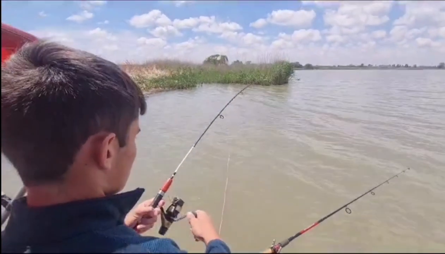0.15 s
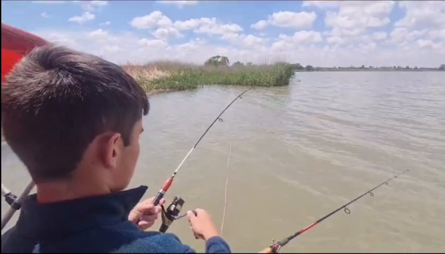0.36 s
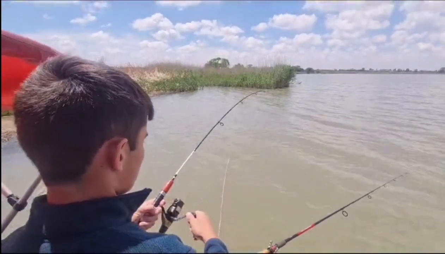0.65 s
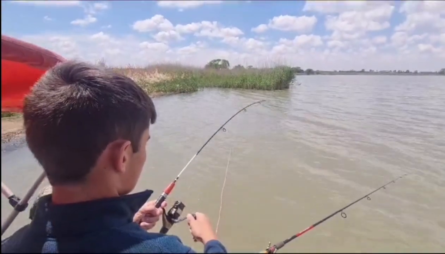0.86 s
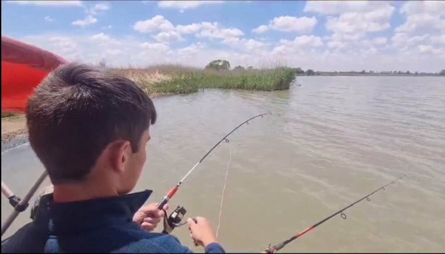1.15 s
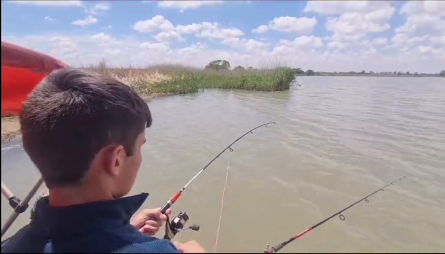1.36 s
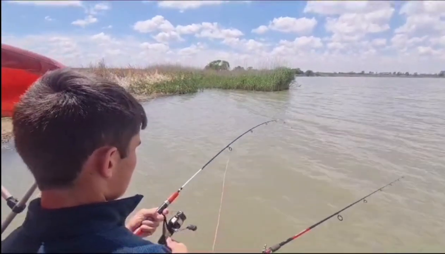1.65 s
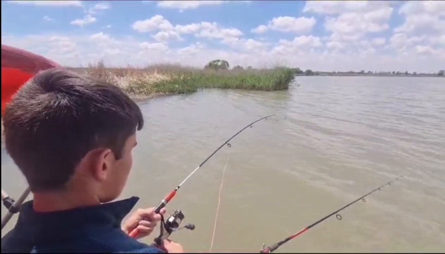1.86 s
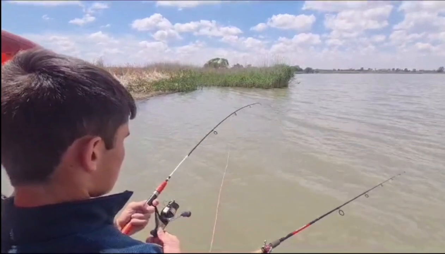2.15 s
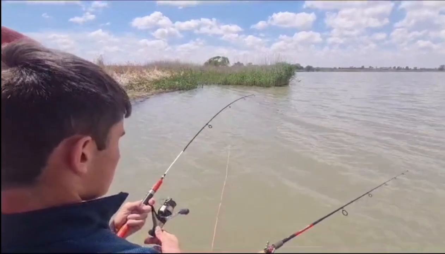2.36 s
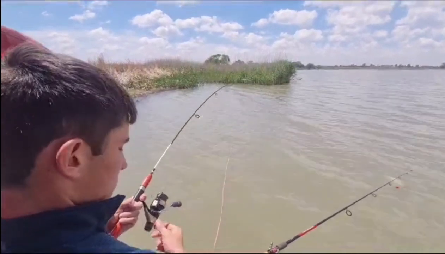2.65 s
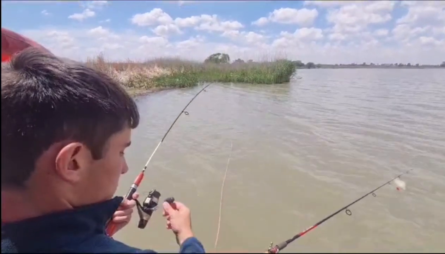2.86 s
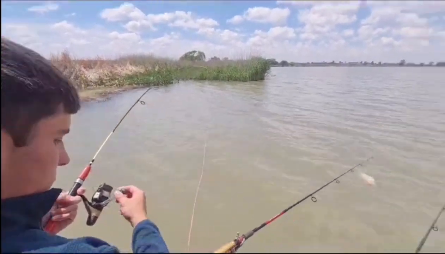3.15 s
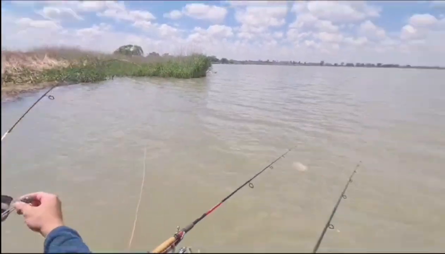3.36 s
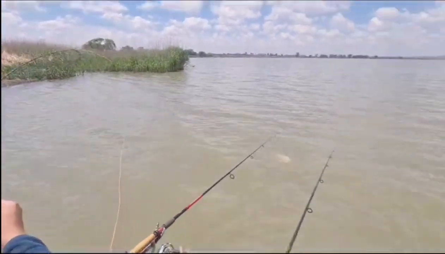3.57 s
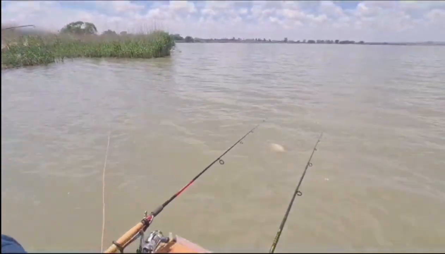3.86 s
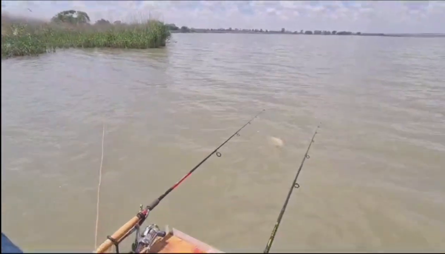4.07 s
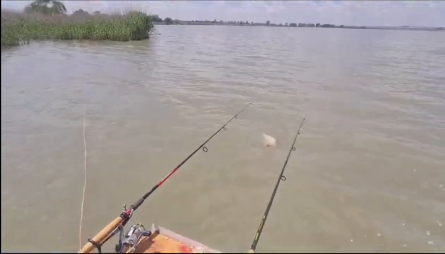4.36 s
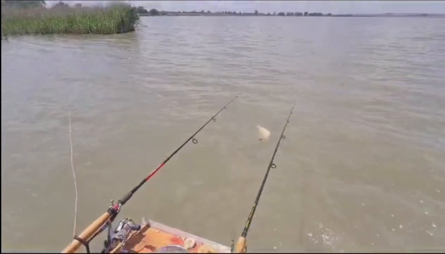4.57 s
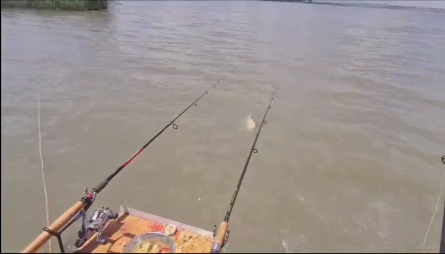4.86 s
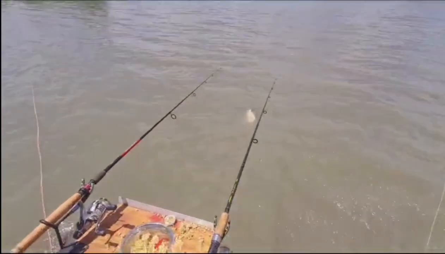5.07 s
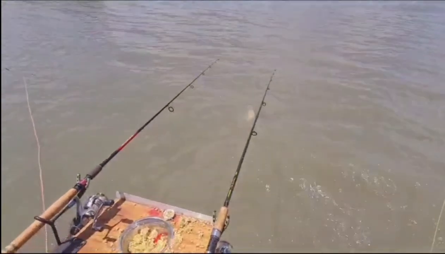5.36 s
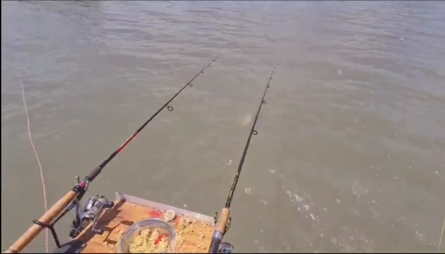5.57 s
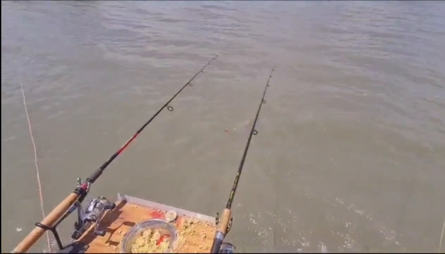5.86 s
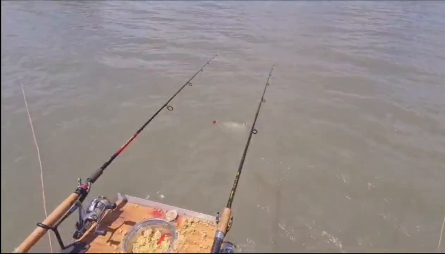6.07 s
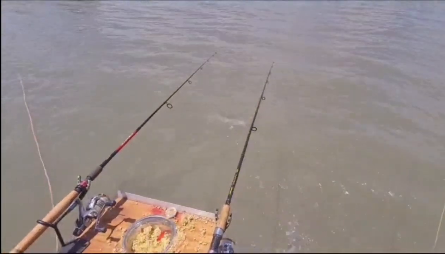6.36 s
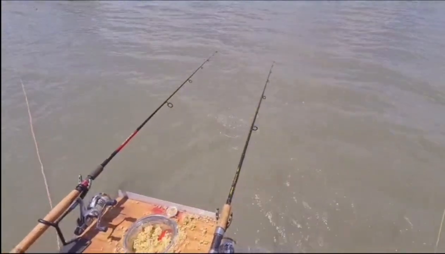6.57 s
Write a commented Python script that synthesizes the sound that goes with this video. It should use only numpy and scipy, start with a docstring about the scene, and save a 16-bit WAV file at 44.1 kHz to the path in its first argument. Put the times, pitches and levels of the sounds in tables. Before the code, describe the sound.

Water slaps and gurgles against a small boat's hull, one hard knock early on, wind buffeting the microphone, then a fishing reel clicks rapidly.

```python
"""Waves slap, gurgle and splash on a small boat: bubble sines and coloured noise, at two ports a few cm apart.
The hull thumps, hums and once knocks hard: blows and wash ring its modes.
Wind buffets each port on its own: gusty low noise and single eddies.
At the end a fishing reel's ratchet clicks, noise gated tooth by tooth, and line hisses off the spool.
Far ripples make a steady hush of noise."""
import sys
import numpy as np
from scipy import signal
from scipy.fft import rfft, irfft
from scipy.io import wavfile
from scipy.ndimage import uniform_filter1d

SR = 44100
rng = np.random.default_rng(int(sys.argv[2]) if len(sys.argv) > 2 else 0)


def store_wav(level_fs):
    """Save 16-bit WAV to argv[1]."""
    pcm = np.round(np.clip(np.atleast_2d(level_fs), -1, 1) * 32767)
    wavfile.write(sys.argv[1], SR, pcm.T.astype(np.int16))


N = 295911
T = np.arange(N) / SR

# Spectrum of the small-bubble gurgle. Each row: frequency in Hz, relative density in dB.
GURGLE_SPECTRUM = [(210, -24), (350, 2), (421, -10), (541, -6.5), (960, -6.5), (1460, -3), (1960, -3.5),
                   (2680, -11), (3200, -22.5), (4160, -49), (7040, -120)]
# Spectrum of spray, also of running line. Each row: frequency in Hz, relative density in dB.
SPRAY_SPECTRUM = [(1530, -3), (2600, -10), (3080, -9), (3980, -5), (7050, -11.5), (8620, -10.5),
                  (10100, -9.5), (14800, -9), (15800, -12), (16500, -54)]


def undb(db):
    """Gain of a level in dB."""
    return 10 ** (np.asarray(db) / 20)


def unit(x):
    """Scale to rms 1."""
    return x / np.sqrt(np.mean(x ** 2))


def curves(table):
    """Interpolate a table's columns over time; its first column is seconds."""
    s, *columns = np.transpose(table)
    return [np.interp(T, s, c) for c in columns]


def colour(x, spectrum):
    """Filter along the last axis by (Hz, dB) points."""
    hz, db = np.transpose(spectrum)
    f = np.arange(x.shape[-1] // 2 + 1) * SR / x.shape[-1]
    gain = undb(np.interp(np.log(f + 1), np.log(hz), db))
    return irfft(rfft(x) * gain, x.shape[-1])


def walk(rate_hz):
    """Random levels held 1 / rate_hz s, slewed, rms near 1."""
    hold = int(SR / rate_hz)
    steps = np.repeat(rng.standard_normal(N // hold + 1), hold)
    return unit(uniform_filter1d(steps, hold))[:N]


def pair(size, alike):
    """Noise for two ports; alike is their correlation."""
    a = np.clip(alike, 0, 1)
    return np.sqrt(a) * rng.standard_normal(size) + np.sqrt(1 - a) * rng.standard_normal((2, size))


def pan(left_minus_right_db):
    """Left and right gains for a level difference."""
    return undb(np.array([left_minus_right_db, -left_minus_right_db]) / 2).reshape(2, -1)


def add(out, s, x):
    """Mix a short sound into out at s seconds."""
    i = max(int(s * SR), 0)
    out[..., i:i + x.shape[-1]] += x[..., :N - i]


def fall(t60_s, rise_s):
    """Time axis and an envelope that rises quickly and dies away."""
    t = np.arange(int(np.clip(t60_s, .004, .6) * SR)) / SR
    attack = 1 - np.exp(-t / max(rise_s, 1e-4))
    return t, attack * 1000 ** (-t / max(t60_s, .004))


def bump(hz, octaves, db):
    """A spectrum raised around one frequency."""
    return [(hz / 2 ** octaves, 0), (hz, db), (hz * 2 ** octaves, 0)]


def burst(spectrum, peak, alike, t60_s, rise_s):
    """Coloured noise that starts quickly and dies away."""
    size = 8192
    t, env = fall(min(t60_s, size / SR), rise_s)
    noise = colour(colour(pair(size, alike), spectrum), peak)
    return env * unit(noise)[:, :len(t)]


def swells(events, rise_share):
    """Gains of events rising and fading straight in dB, one row per level column; powers add.

    The last column, s to fade 20 dB, counts as at least 0.01; the rise takes rise_share of it."""
    power = 0
    for s, *dbs, fade_s in events:
        fade_s = max(fade_s, .01)
        drop_db = 20 * np.maximum((T - s) / fade_s, (s - T) / (fade_s * max(rise_share, .05)))
        power = power + undb(np.array(dbs)[:, None] - drop_db) ** 2
    return np.sqrt(power)


def bubble(hz, cycles, glide, onset_cycles):
    """A dying sine that rises as the bubble nears the surface; glide is the share risen in the cycles."""
    t, env = fall(cycles / hz * 3, onset_cycles / hz)
    phase = 2 * np.pi * hz * (t + glide * t ** 2 * hz / cycles / 2)
    return env / env.max() * np.sin(phase)


def water():
    """Lapping and waves set gurgle, spray and hull hum; slaps, splashes and gulps ride on top."""
    # Lapping between waves. Each row: time in seconds, gurgle in dB, spray in dB.
    lap_table = [(0.0, -68.5, -75), (0.2, -66, -69), (0.48, -65.5, -80), (0.68, -77, -76), (0.75, -57, -61),
                 (1.4, -58, -57), (1.65, -46, -51.5), (2.1, -64, -58.5), (2.45, -67, -59.5),
                 (2.7, -59.5, -53), (3.25, -62, -61.5), (3.52, -56.5, -60), (3.72, -49, -56),
                 (4.25, -65.5, -59), (4.8, -65.5, -61.5), (5.1, -60, -50.5), (6.2, -62, -65),
                 (6.7, -57.5, -50)]
    # Waves at the hull. Each row: crest in seconds, gurgle, spray and hull hum in dB, 20 dB fade in seconds.
    wave_table = [(0.14, -56, -52, -56, 0.08), (0.27, -58.5, -56.5, -50, 0.17),
                  (0.76, -52.5, -59, -78, 0.2), (0.97, -53.5, -69, -51, 0.12),
                  (1.15, -54.5, -47, -52, -0.4), (1.27, -32, -33, -27, 0.0741),
                  (1.49, -49.5, -70, -50, .25), (1.75, -47.5, -43.5, -59, 0.2), (1.96, -73, -49, -76, 0.3),
                  (2.26, -49, -52, -53, 0.17), (2.36, -39.5, -44.5, -48.5, 0.15),
                  (2.56, -40.5, -47, -44, 0.15), (2.62, -41, -43, -43, 0.01), (2.9, -50, -49, -62, 0.3),
                  (3.16, -53, -59, -57, 0), (3.43, -37.5, -39.5, -39, 0.0919),
                  (3.61, -37.5, -50, -44, 0.1328), (3.9, -41, -43.5, -72, 0.1844),
                  (4.14, -59.5, -54.5, -77, 0.3), (4.54, -51, -55, -50.5, 0.23),
                  (4.68, -50.5, -56, -68, 0.06), (4.95, -48.5, -51.5, -58, 0.28),
                  (5.34, -61, -51, -62, 0.4), (5.69, -44.5, -53, -42.5, .15), (5.94, -55.5, -50, -51, 0.27),
                  (6.33, -48.5, -56, -53, 0.35)]
    hum_minus_gurgle_db = -2  # while lapping
    port_lag_samples = 6  # the left port hears the water later
    gurgle_db, spray_db = curves(lap_table)
    lapping = undb([gurgle_db, spray_db, gurgle_db + hum_minus_gurgle_db])
    wash, fizzing, hum = np.hypot(lapping, swells(wave_table, 0.68))
    out = (gurgle() * wash + spray() * fizzing * undb(1.92 * walk(40))) * pan(-1.1)
    out += hull(hum)
    slaps(out)
    splashes(out)
    gulps(out)
    return np.array([np.roll(out[0], port_lag_samples), out[1]])


def slaps(out):
    """Each wave slap is churned noise plus the ringing of a trapped air pocket."""
    # Each row: start in seconds, level in dB, air pocket pitch in Hz, churn t60 in seconds.
    slap_table = [(0.104, -36, 422, 0.073), (0.253, -38.5, 790, 0.041), (0.269, -33.5, 1500, 0.026),
                  (0.737, -37, 770, 0.05), (1.192, -26, 408, 0.12), (1.253, -20, 410, 0.067),
                  (1.279, -30, 1300, 0.088), (1.396, -32.5, 880, 0.024), (1.44, -31, 1360, 0.037),
                  (1.464, -36, 1460, 0.052), (1.704, -29, 720, 0.11), (1.743, -31, 726, 0.12),
                  (1.764, -28.5, 780, 0.086), (1.836, -30, 890, 0.036), (1.916, -33, 1310, 0.028),
                  (2.022, -35.5, 844, 0.058), (2.275, -27, 1660, 0.044), (2.358, -19, 1490, 0.043),
                  (2.373, -20, 1740, 0.041), (2.491, -26, 1730, 0.023), (2.526, -22.5, 1260, 0.092),
                  (2.544, -17, 1136, 0.018), (2.59, -35, 700, 0.063), (2.777, -32.5, 1440, 0.15),
                  (2.894, -34, 880, 0.077), (2.973, -34, 1410, 0.025), (2.991, -30.5, 2330, 0.015),
                  (3.338, -33, 1170, 0.029), (3.415, -25, 413, 0.079), (3.432, -17.5, 1770, 0.034),
                  (3.446, -28.5, 410, 0.15), (3.557, -33, 800, 0.023), (3.592, -24.5, 1500, 0.1),
                  (3.606, -25.5, 565, 0.066), (3.63, -32, 1500, 0.07), (3.654, -31, 666, 0.052),
                  (3.8, -21.5, 1680, 0.041), (3.842, -34.5, 513, 0.18), (3.881, -27.5, 1320, 0.039),
                  (3.895, -26, 528, 0.14), (3.97, -26.5, 1400, 0.025), (4.081, -34, 820, 0.023),
                  (4.136, -31, 1510, 0.08), (4.53, -23.5, 1780, 0.022), (4.684, -26, 2240, 0.047),
                  (4.753, -36.5, 1290, 0.035), (4.79, -33, 1450, 0.052), (4.874, -35, 1510, 0.053),
                  (4.934, -31, 1670, 0.058), (4.958, -28, 1540, 0.022), (5.672, -31.5, 567, 0.03),
                  (6.303, -29.5, 546, 0.02), (6.373, -31.5, 820, 0.064), (6.519, -34, 784, 0.059),
                  (6.541, -34.5, 1160, 0.061), (6.608, -34.5, 770, 0.064)]
    for s, db, hz, t60_s in slap_table:
        churn = burst(GURGLE_SPECTRUM, bump(hz, 0.76, 13.6), 0.63, t60_s, 0.038 * t60_s)
        pocket = bubble(hz, 8.3, 0.022, 0.14)
        add(out, s, 0.5 * undb(db) * churn * pan(-0.48))
        add(out, s, 0.45 * undb(db) * pocket * pan(-1.7))


def splashes(out):
    """Splashes and droplets: short noise bursts brightest at one frequency."""
    # Each row: time in seconds, level in dB, brightest frequency in Hz, t60 in seconds.
    splash_table = [(0.137, -38, 4930, 0.039), (0.153, -39, 3600, 0.042), (0.252, -41, 13890, 0.016),
                    (0.268, -44, 9400, 0.018), (0.725, -47, 5420, 0.025), (0.803, -41, 5260, 0.02),
                    (0.842, -43, 9100, 0.063), (1.124, -43, 13000, 0.025), (1.258, -22, 3700, 0.028),
                    (1.271, -23, 10580, 0.038), (1.506, -24, 15200, 0.02), (1.66, -41, 3600, 0.049),
                    (1.711, -35.5, 5530, 0.075), (1.743, -40, 13790, 0.099), (1.835, -35.5, 13300, 0.054),
                    (1.933, -43, 3800, 0.12), (1.976, -37, 8300, 0.038), (2.173, -41.5, 8510, 0.045),
                    (2.285, -39, 5080, 0.03), (2.34, -37, 4800, 0.048), (2.363, -27, 5750, 0.03),
                    (2.373, -31.5, 9500, 0.064), (2.433, -37.5, 10560, 0.017), (2.521, -36.5, 13900, 0.022),
                    (2.534, -31, 10490, 0.024), (2.542, -35, 4870, 0.052), (2.555, -30, 5000, 0.022),
                    (2.682, -43, 12500, 0.022), (2.86, -39, 12880, 0.081), (2.93, -41, 14330, 0.037),
                    (3.035, -45, 4830, 0.1), (3.351, -42, 7000, 0.12), (3.415, -22, 8500, 0.03),
                    (3.427, -30, 4170, 0.069), (3.482, -47, 4540, 0.017), (3.506, -41, 4700, 0.036),
                    (3.556, -35.5, 5010, 0.018), (3.592, -26, 8300, 0.046), (3.61, -36, 3800, 0.056),
                    (3.707, -39.5, 4100, 0.05), (3.796, -41.5, 4430, 0.053), (3.893, -39.5, 3800, 0.046),
                    (3.911, -22, 3900, 0.014), (4.003, -35.5, 6540, 0.04), (4.117, -38.5, 7850, 0.051),
                    (4.141, -29, 4560, 0.037), (4.26, -47, 5200, 0.03), (4.32, -43, 11000, 0.032),
                    (4.396, -45, 5500, 0.03), (4.438, -42.5, 4960, 0.064), (4.465, -41, 5000, 0.02),
                    (4.479, -42, 13400, 0.025), (4.507, -37.5, 5130, 0.042), (4.527, -32.5, 4600, 0.062),
                    (4.62, -39, 11270, 0.024), (4.669, -33.5, 10250, 0.029), (4.684, -35.5, 3510, 0.032),
                    (4.79, -40.5, 7000, 0.038), (4.903, -44, 10390, 0.032), (4.946, -33, 4900, 0.03),
                    (4.959, -40, 7800, 0.045), (5.014, -47, 3810, 0.049)]
    for s, db, hz, t60_s in splash_table:
        fizz = burst(SPRAY_SPECTRUM, bump(hz, 0.33, 10.6), 0.2, t60_s, 0.04 * t60_s)
        add(out, s - .001, 1.12 * undb(db) * fizz * pan(-0.8))


def gulps(out):
    """Large rising bubbles: upward sine sweeps."""
    # Each row: start in seconds, start pitch in Hz, end pitch in Hz, length in seconds, level in dB.
    gulp_table = [(2.575, 500, 1070, 0.0504, -37.5), (3.055, 690, 940, 0.033, -46.5),
                  (3.133, 690, 990, 0.046, -49.5)]
    for s, start_hz, end_hz, length_s, db in gulp_table:
        hz = np.geomspace(start_hz, end_hz, int(length_s * SR))
        sweep = np.sin(2 * np.pi * np.cumsum(hz) / SR)
        add(out, s, undb(db) * np.hanning(len(hz)) * sweep)


def gurgle():
    """Many small bubbles ring at random over churning noise; rms 1."""
    grains = np.zeros((2, N))
    for place, pitch, size, side, long in rng.random((2800, 5)):
        grain = bubble(400 * 2 ** (2.7 * pitch), 3.86 + 14.8 * long ** 2, 0.15, 1.95)
        add(grains, place * N / SR, grain * undb(16.4 * size ** 3) * pan(12.0 * (side - .5)))
    return unit(colour(unit(grains) + 1.09 * pair(N, 0.43), GURGLE_SPECTRUM))


def spray():
    """Noise, briefly ringing droplets and bands of fizzing drops; rms 1."""
    out = 1.07 * pair(N, 0.077)
    for place, pitch, size, side in rng.random((900, 4)):
        droplet = 2.05 * bubble(3000 * 2 ** (1.5 * pitch), 7.4, 0.086, 0.65)
        add(out, place * N / SR, droplet * undb(10.0 * size ** 3) * pan(9.7 * (side - .5)))
    drops_per_s, power_decay_s = 150, 0.0015
    for hz in (4500, 7500, 12500):  # drops of each size fizz in their own band
        drops = (rng.random(N) < drops_per_s / SR) * undb(3.65 * rng.exponential(size=N))
        power = signal.lfilter([1], [1, -np.exp(-1 / (power_decay_s * SR))], drops ** 2)
        out += .5 * unit(colour(np.sqrt(power) * pair(N, 0.21), bump(hz, 0.79, 11.0)))
    return unit(colour(out, SPRAY_SPECTRUM))


def ring(push, modes):
    """Play a force through decaying resonances, rows of (Hz, dB, t60 s)."""
    out = 0
    for hz, db, t60_s in modes:
        pole = np.exp(2j * np.pi * hz / SR - np.log(1000) / (t60_s * SR))
        out = out + undb(db) * signal.lfilter([1], [1, -pole], push).imag
    return out


def hull(hum):
    """Blows ring the modes near the struck panel; the wash keeps the hull humming."""
    # Blows. Each row: time in seconds, level in dB, struck panel pitch in Hz,
    # lowest modes relative to level in dB, contact in seconds.
    thump_table = [(0.017, -32, 219, -32, 0.0087), (.1, -38, 295, -35, 0.0067),
                   (.27, -31, 293.5, -21, 0.014), (.297, -32, 280, -25, 0.013), (.33, -39, 282, -32, .012),
                   (.365, -39.5, 279, -28, 0.0091), (.843, -39, 270, -27, 0.012),
                   (1.189, -27, 379, -20, .012), (1.257, -22, 300, 13, 0.00454),
                   (1.448, -39.5, 301, -26, 0.011), (1.507, -27, 360, -32, .012),
                   (2.166, -30.5, 211, -24, 0.018), (2.265, -31, 215, -34, .013),
                   (2.363, -29.5, 256, -14.5, 0.02), (2.539, -37, 269, -24, 0.01985),
                   (3.148, -37, 290, -2.5, 0.022), (3.416, -29.5, 272, -6, 0.025),
                   (3.6, -37, 272, -35, .012), (3.897, -39, 305, -31, 0.023), (5.301, -40.5, 290, 2, .014),
                   (6.386, -39, 245, -24, 0.02), (6.611, -41, 266, -14, .011)]
    # Panel modes. Each row: frequency in Hz, gain in dB, t60 in seconds.
    panel_modes = [(165, -1, 0.15), (197.5, -4.5, 0.073), (241, -1, 0.12), (270.5, 3, 0.15),
                   (298.9, 4, 0.17), (327.5, -7, 0.63), (369, 4.5, 0.07)]
    # Whole-hull modes, the close pair beats. Each row: frequency in Hz, gain in dB, t60 in seconds.
    lowest_modes = [(86.5, -20, 0.32), (113.8, -6.5, 0.31), (119.8, -4.5, 0.28)]
    out = unit(ring(rng.standard_normal(N) * undb(3.45 * walk(40)), panel_modes)) * hum
    soft = np.hanning(int(0.0025 * SR))
    soft = soft / soft.sum()
    chances = rng.random((len(thump_table), 8))
    for (s, db, hz, low_db, contact_s), chance in zip(thump_table, chances):
        push = np.zeros(SR // 2)
        push[0] = 1
        # the water keeps jolting the panel while the contact lasts
        jolts = (chance[:4] * contact_s * SR).astype(int) + 1
        push[jolts] = 2.17 * (chance[4:] - .5)
        # modes weaken by 78.5 dB per octave away from the struck panel
        near = [(f, g - 78.5 * abs(np.log2(f / hz)), t60_s) for f, g, t60_s in panel_modes]
        low = [(f, g + low_db, t60_s) for f, g, t60_s in lowest_modes]
        add(out, s, undb(db) * ring(signal.lfilter(soft, [1], push), near))
        # the whole hull follows the first blow only
        first = np.r_[soft, np.zeros(SR // 2)]
        fade_in = np.clip(T[:len(first)] / 0.0054, 0, 1)
        add(out, s - 0.001, undb(db) * ring(first, low) * fade_in)
    # the panel's far end reaches the two ports late and in opposite phase
    far_end = 0.1 * np.roll(out, 40) * np.array([[1], [-1]])
    return (out + far_end) * pan(-1.4)


def wind():
    """Eddies rolling over each port: low noise in sharp-edged gusts, unrelated left and right."""
    # Eddy spectrum. Each row: frequency in Hz, relative density in dB.
    eddy_spectrum = [(12, -30), (25, -6), (45, -1), (65, -1), (100, -8.5), (160, -14.5), (210, -27),
                     (300, -24.5), (600, -40.5), (900, -36), (1500, -100)]
    # Steady breeze. Each row: time in seconds, level in dB.
    breeze_table = [(0.0, -49), (0.3, -59), (0.45, -73), (0.65, -84), (0.8, -45), (1.5, -56), (2.0, -55),
                    (2.35, -60), (2.9, -53), (3.7, -50.5), (4.0, -58), (4.6, -66), (5.03, -74), (5.2, -43),
                    (5.7, -49.5), (6.2, -44), (6.7, -71)]
    # Gusts. Each row: peak time in seconds, left in dB, right in dB, 20 dB fade in seconds.
    gust_table = [(0.35, -48, -50, 0.15), (0.8, -33, -44, -0.3), (1.04, -58, -36, 0.35),
                  (1.16, -31.5, -39, 0.23), (1.6, -34, -34.5, .18), (1.82, -41.5, -39.5, 0.45),
                  (2.2, -58, -50, -0.3), (3.05, -40, -40, 0.16), (3.43, -46, -49, 0.2),
                  (3.81, -46, -37, -0.1), (4.15, -36.5, -33.5, 0.05), (4.23, -62, -45.5, 0.23),
                  (4.42, -34.5, -46, 0.18), (4.53, -33, -28, -0.08), (4.69, -35, -45, 0.08),
                  (4.84, -42, -42, 0.06), (5.12, -53, -41, 0.07), (5.27, -38, -33, .1),
                  (5.31, -55, -35, 0.22), (5.43, -60, -37.5, 0.2), (5.61, -53, -38.5, 0.07),
                  (5.85, -34, -35.5, .25), (6.16, -38.5, -66, 0.3), (6.28, -29, -48, 0.1),
                  (6.36, -28.5, -30.5, 0.12), (6.54, -33.5, -48, 0.32), (6.64, -33.5, -35, 0.4),
                  (6.7, -37, -43, .1)]
    # Single strong eddies. Each row: start in seconds, peak in dB before panning, pitch in Hz,
    # left minus right in dB.
    pop_table = [(1.115, -32, 84, -20), (1.143, -38, 65, 16), (1.602, -35, 71.4, 15),
                 (5.298, -31.5, 80, -22), (5.44, -40.5, 73.5, -21), (5.6, -42.5, 93, -23),
                 (5.806, -37, 66, -13), (5.84, -39, 62, 14), (6.141, -34.5, 68, 26), (6.268, -32, 93, 20.5),
                 (6.351, -36.5, 69.4, -17), (6.371, -41, 70, 22), (6.519, -31, 61.6, 23),
                 (6.637, -32.5, 65, -18), (6.654, -27.5, 62.6, 18)]
    flurry = np.array([undb(1.94 * walk(30) + 2.2 * walk(70)) for _ in range(2)])
    rumble = unit(colour(flurry * rng.standard_normal((2, N)), eddy_spectrum))
    out = rumble * np.hypot(undb(curves(breeze_table)), swells(gust_table, 0.57))
    for s, peak_db, hz, side_db in pop_table:
        t, env = fall(3.2 / hz, 0.015)
        # the pressure swing starts fast and slows as the eddy passes
        swing = env * np.sin(2 * np.pi * hz * (t + 0.0022 * (1 - np.exp(-t / 0.0092))))
        add(out, s, swing / abs(swing).max() * undb(peak_db) * pan(side_db))
    return out


def tooth_times():
    """Times in s of the ratchet teeth, and the spool speed in teeth per s."""
    # Single teeth while the spool is nearly held. Each entry: time in seconds.
    held_teeth = [5.055, 5.066, 6.021, 6.059, 6.113, 6.184, 6.221, 6.251, 6.294, 6.33]
    # Two free runs of the spool. Each row of a run: time in seconds, count of teeth passed.
    spool_runs = [
        [(5.102, 0), (5.125, 2), (5.142, 3), (5.189, 7), (5.258, 14), (5.374, 27), (5.407, 30), (5.462, 34),
         (5.498, 37), (5.547, 40), (5.647, 45), (5.677, 47), (5.833, 60), (5.882, 63), (5.996, 69)],
        [(6.357, 0), (6.43, 4), (6.501, 9), (6.576, 17), (6.7, 31)],
    ]
    times, speed = list(held_teeth), 0
    for run in spool_runs:
        s, teeth = np.transpose(run)
        times += list(np.interp(np.arange(teeth[-1] + 1), teeth, s))
        speed = speed + np.gradient(np.interp(T, s, teeth)) * SR
    return times, speed


def reel():
    """The pawl chatters over each tooth for a few ms and rings the reel's small parts; line hisses."""
    # Small parts. Each row: frequency in Hz, width in Hz, gain facing the reel in dB, turned away in dB.
    part_table = [(2830, 27, 1, -27), (3850, 235, -2, 5.5), (4880, 340, -1, 8), (6850, 220, -15, 10),
                  (8870, 470, -6.5, -3), (10120, 93, 3, 9), (10790, 350, 6, 10.5), (13700, 590, -3, -3),
                  (16200, 1200, -18, 4)]
    # Ratchet. Each row: time in seconds, level in dB, left minus right in dB.
    level_table = [(5.05, -36.5, 4), (5.11, -37, 4.5), (5.15, -41, 8), (5.5, -32, 5), (5.6, -35, 5),
                   (5.7, -38.5, 3.5), (6.0, -42.5, 1.5), (6.3, -42, 2), (6.5, -41.5, 1.5), (6.7, -39.5, 2)]
    # The ports swing away from the reel. Two entries: start and end in seconds.
    turn_s = (5.58, 5.85)
    line_db = -53  # at 100 teeth per s
    times, speed = tooth_times()
    gate = np.zeros(N)
    for t0, (late, size, long) in zip(times, rng.standard_normal((len(times), 3))):
        snap = np.hanning(int(0.009 * (1 + 0.26 * np.tanh(long)) * SR))
        snap = snap * np.exp(-1.5 * np.linspace(-1, 1, num=len(snap)))  # sharper at the front
        add(gate, t0 - len(snap) / SR / 2 + 0.00093 * late, snap * undb(1.3 * size))
        add(gate, t0, .2 * fall(.025, .001)[1])  # the parts buzz on briefly
    chatter = gate * pair(N, 0.24) * undb(1.73 * walk(1500))

    f = np.geomspace(1500, SR / 2, num=300)
    low_cut = np.clip(f / 3000, 0, 1) ** 4
    hz, width_hz, *part_dbs = np.transpose(part_table)[:, :, None]
    views = []
    for part_db in part_dbs:
        peaks = np.sum(undb(part_db) / (1 + ((f - hz) / width_hz) ** 2), axis=0)
        gain = low_cut * (undb(-14.0) + peaks)
        views.append(colour(chatter, np.transpose([f, 20 * np.log10(gain)])))
    facing, away = views
    turn = np.interp(T, turn_s, [0, 1])
    rung = unit((1 - turn) * facing + turn * away) * np.std(chatter)

    db, side_db = curves(level_table)
    clicks = np.array([rung[0], -rung[1]]) * undb(db) * pan(side_db)  # opposite phase at the ports
    hiss = unit(colour(pair(N, 0.18), SPRAY_SPECTRUM)) * undb(line_db)
    return clicks + hiss * uniform_filter1d(speed, size=2000) / 100


def lake():
    """Countless far ripples blend into a smooth hush."""
    # Each row: frequency in Hz, relative density in dB.
    hush_spectrum = [(180, -39), (300, -14), (689, 1), (946, -1), (1040, -13), (2250, -14.5), (8640, -25),
                     (15000, -29), (16000, -30)]
    return unit(colour(pair(N, 0.27), hush_spectrum)) * undb(-70)


def scene():
    """Everything at the two ports."""
    return water() + wind() + reel() + lake()


def record(dry):
    """The microphone drops the deepest bass; the recorder cuts the top."""
    bass_cut_hz, top_hz = 35.0, 15750
    thin = signal.sosfilt(signal.butter(2, bass_cut_hz, "high", fs=SR, output="sos"), dry)
    return signal.sosfilt(signal.ellip(10, .2, 80, top_hz, fs=SR, output="sos"), thin)


dry = scene()
out = record(dry)
store_wav(out)
```